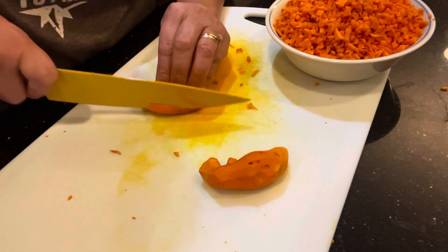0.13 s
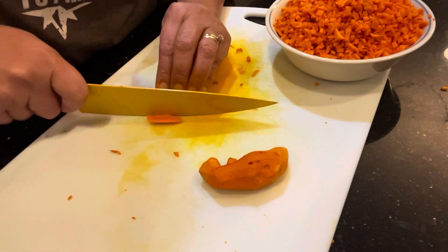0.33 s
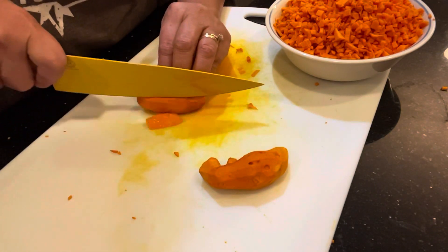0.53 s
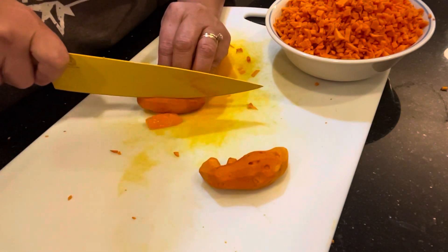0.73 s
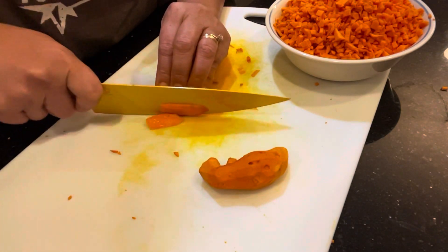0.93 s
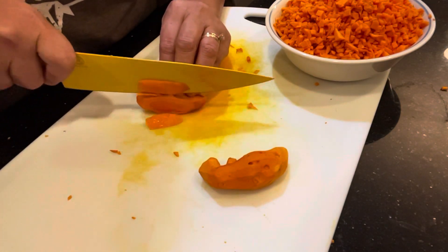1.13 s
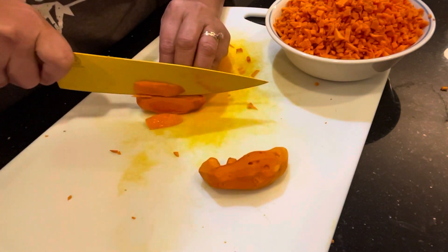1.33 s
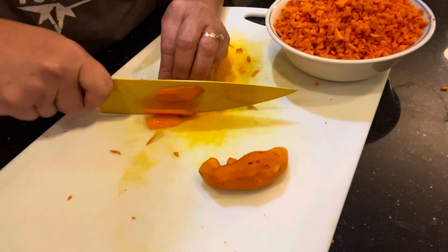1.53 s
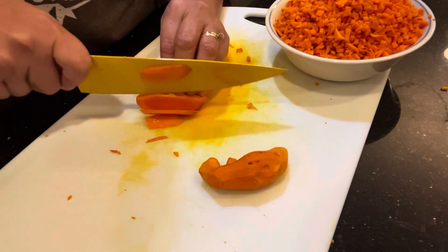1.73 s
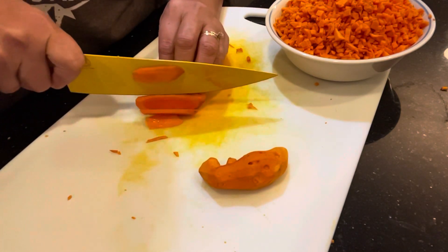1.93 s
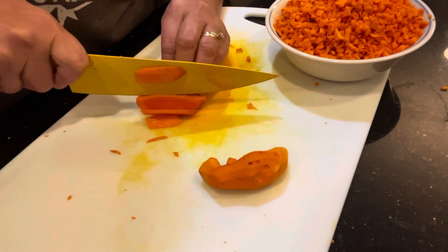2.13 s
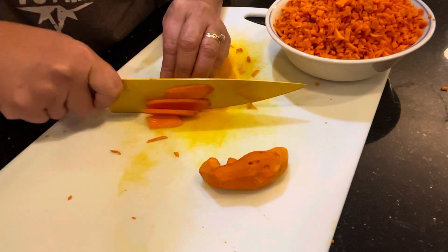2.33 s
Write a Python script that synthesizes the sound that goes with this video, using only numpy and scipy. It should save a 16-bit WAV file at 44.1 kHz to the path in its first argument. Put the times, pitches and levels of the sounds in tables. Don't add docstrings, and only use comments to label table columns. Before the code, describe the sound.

Knife chops through a firm root, close in stereo. Faint taps and a swelling wet crunch lead to a hard, low-bodied knock on the plastic board at 0.16 seconds. Similar crunch-and-knock strokes land at 0.82, slightly the loudest, then 1.46 and 2.27. Between them, tiny ticks and soft slice rubbing. Each blow rings about half a second in the kitchen over quiet low hum.

```python
import sys
import numpy as np
from scipy import signal
from scipy.fft import rfft, irfft, next_fast_len
from scipy.io import wavfile
from scipy.ndimage import uniform_filter1d

SR = 44100
rng = np.random.default_rng(int(sys.argv[2]) if len(sys.argv) > 2 else 0)


def file_out(sig):
    cols = np.atleast_2d(sig).T
    lim = np.clip(cols, -1, 1)
    pcm = np.round(lim * 32767).astype(np.int16)
    wavfile.write(sys.argv[1], SR, pcm)


def invert_db(level):
    return 10 ** (np.asarray(level, dtype=float) / 20)


N = 105046

# start_s, peak_db, brightness_db (per octave), last_rasp_db, split_db
IMPACTS = [
    (.162, -4.5, 1.5, -28, -8.5),
    (0.8184, -3.5, 0.5, -32.5, -17),
    (1.464, -4, 1.5, -37, -14),
    (2.268, -4.5, 0.84, -39.5, -13.5),
]


def evened(x):
    return x / np.sqrt(np.mean(x ** 2) + 1e-20)


def read(points, hz):
    f, value = np.transpose(points)
    return np.interp(np.log(hz + 1), np.log(f + 1), value)


def shape(x, response):
    size = next_fast_len(x.shape[-1] + SR // 4)
    hz = np.fft.rfftfreq(size, 1 / SR)
    return irfft(rfft(x, size) * response(hz), size)[..., :x.shape[-1]]


def add(mix, s, sound):
    part = mix[..., round(s * SR):][..., :sound.shape[-1]]
    part += sound[..., :part.shape[-1]]


def mode(hz, centre_hz, t60):
    width = 2.2 / t60
    return 1j * hz * width / (centre_hz ** 2 - hz ** 2 + 1j * hz * width)


def bumps(hz, table):
    return sum(db * np.exp(-((hz - f) / w) ** 2) for f, w, db in table)


def hum():
    # pitch_hz, level_db (per Hz)
    hum_tone = [(22, -15), (45, 0.5), (60, 2), (220, -6), (400, -20), (1200, -36.5), (5000, -47),
                (15800, -46.5)]
    # pitch_hz, likeness (0 to 1)
    coherence = [(60, 1), (380, 0.43), (2400, 0.13), (9000, 0.27), (12000, 0.91)]
    frames, hz = N // 512 + 5, np.fft.rfftfreq(2048, 1 / SR)
    a, b, c, d, patches = rng.standard_normal((frames, 1025, 5)).T
    patches = evened(uniform_filter1d(uniform_filter1d(patches, 6, 0), 4, 1))
    same = np.clip(read(coherence, hz), -1, 1)[:, None]
    left = a + 1j * b
    right = same * left + np.sqrt(1 - same ** 2) * (c + 1j * d)
    z = np.array([left, right])
    z *= invert_db(read(hum_tone, hz)[:, None] + 2.0 * patches) * (hz > 15)[:, None]
    return invert_db(-53) * evened(signal.istft(z, nperseg=2048, noverlap=1536)[1][:, :N])


def crunch():
    # time_s, level_db
    strokes = [
        [(0.03, -89), (0.05, -70), (0.099, -67), (0.105, -49.5), (0.112, -51.5), (0.124, -47), (0.15, -46),
         (0.154, -38.5)],
        [(0.69, -97), (0.718, -57), (0.728, -62.5), (0.745, -58.5), (0.762, -52.5), (0.78, -40.5), (0.808, -37),
         (0.811, -42)],
        [(1.32, -87.5), (1.345, -73.5), (1.39, -62), (1.402, -50), (1.43, -43), (1.456, -36.5)],
        [(1.97, -81.5), (2.03, -73.5), (2.098, -72.5), (2.17, -64), (2.188, -55), (2.204, -49), (2.246, -39),
         (2.26, -41)],
    ]
    # start_s, length_s, level_db
    scuffs = [(.048, 0.014, -59), (.067, .013, -52.5), (0.081, 0.013, -60.5), (.715, 0.0092, -59.5),
              (2.036, 0.014, -70.5), (2.054, .022, -63), (2.121, 0.024, -69.5), (.2, 0.064, -70.5),
              (0.307, .012, -70), (.31, 0.14, -72), (1.305, 0.0046, -76), (1.96, .008, -73.5),
              (0.507, 0.022, -69), (0.596, 0.026, -82), (0.879, 0.12, -71), (0.976, .06, -75),
              (1.144, 0.037, -87), (1.217, 0.011, -67.5), (1.264, 0.017, -72), (1.3, 0.018, -83),
              (1.599, 0.097, -65.5), (1.8, 0.07, -77.5)]
    # pitch_hz, level_db (per Hz)
    fibre_tone = [(150, -3.5), (400, 0.5), (1500, -5.5), (3000, -2.5), (6000, 0.5), (8500, -2.5),
                  (12500, -3), (15600, 1.54)]
    # pitch_hz, width_hz, level_db
    blade_modes = [(7920, 2500, 5), (4730, 320, 1), (11030, 170, 3.5), (15900, 450, -7.5)]
    rasp_lead_s, rasp_rise_s, rasp_fall_s, release_s = 0.0024, 0.0028, 0.0015, 0.002
    grains_per_s, grain_spread_db, hiss_share = 9800, 2.5, 0.75
    clump_db, clump_s = 2, 0.004

    t, press, rasp = np.arange(N) / SR, 0, 0
    for curve, (s, _, _, rasp_db, _) in zip(strokes, IMPACTS):
        release = np.exp(-np.maximum(t - s, 0) / release_s)
        press = press + invert_db(np.interp(t, *np.transpose(curve), left=-130)) * release
        from_peak = t - s + rasp_lead_s
        width_s = np.where(t < s - rasp_lead_s, rasp_rise_s, rasp_fall_s)
        rasp = rasp + invert_db(rasp_db) * np.exp(-(from_peak / width_s) ** 2)
    for s, length, db in scuffs:
        press = press + invert_db(db) * np.sin(np.pi * np.clip((t - s) / length, 0, 1)) ** 2
    clumps = evened(uniform_filter1d(rng.standard_normal(N), round(clump_s * SR)))
    press = press * invert_db(clump_db * clumps)

    sizes = invert_db(grain_spread_db * np.minimum(rng.exponential(1, N), 4))
    snaps = sizes * (rng.random(N) < grains_per_s / SR)
    drive = evened(snaps * rng.choice([-1., 1.], N)) + hiss_share * rng.standard_normal(N)
    grains = evened(shape(drive, lambda hz: invert_db(read(fibre_tone, hz) + bumps(hz, blade_modes))))
    sung = shape(rasp * grains, lambda hz: 1 + invert_db(11.5) * mode(hz, 7200, 0.0022))
    return invert_db(7.0) * (press * grains + sung)


def tick(hz):
    t = np.arange(600) / SR
    return np.sin(2 * np.pi * hz * t) * np.exp(-t * hz * .6)


def rush():
    rush_s, rush_db, rush_hz, rush_width_hz = 0.005, 0.5, 2860, 2500
    snap_lead_s, snap_s, snap_db = 0.0097, 0.0035, -5.5
    t = np.arange(-2500, 100) / SR
    crackle = rng.standard_normal(len(t)) * invert_db(1.5 * rng.standard_normal(len(t)))
    crackle = evened(shape(crackle, lambda hz: mode(hz, rush_hz, 2.4 / rush_width_hz) ** 2))
    since = np.maximum(t + snap_lead_s, 0) / snap_s
    snap = invert_db(snap_db) * np.minimum(5 * since, 1) * np.exp(-since ** 2)
    swell = np.exp(np.minimum(t, -8 * t) / rush_s) + snap
    return invert_db(rush_db) * crackle * swell / 3


def knock(bright_db):
    # pitch_hz, level_db (per Hz)
    blow_tone = [(44, -10.5), (120, -4), (635, 0), (1200, -1.5), (2600, -10), (4200, -18), (6300, -30),
                 (9000, -39.5)]
    # pitch_hz, delay_ms
    lag = [(45, 41), (110, 9.5), (250, 4), (600, 3.5), (1000, 2.5), (1650, 1.83), (2100, -0.19),
           (5000, 0.41)]
    # pitch_hz, left_db, right_db, t60_s
    board_modes = [(57.5, 7.5, 7.5, 0.54), (53, 2, 1.5, 0.24), (112, -9, -6, 0.15), (239.5, -6.5, -8, 0.12),
                   (415.8, -3.5, 5.5, 0.083), (716.3, -2.5, 0.5, 0.088), (1020, -2, -2, 0.022),
                   (1160, -1, -11, 0.027), (1319, -5.5, -6.5, 0.05), (1673, -7, -5, 0.054),
                   (2087, -0.5, 1.5, .01), (139.6, -4, -5.5, 0.31), (3031, -0.5, -8, 0.028),
                   (3810, -7, -12, 0.0033)]
    # left_db, right_db, room_db
    direct_db = [-3.5, -4, -4]
    # pitch_hz, width_hz, left_db, right_db
    nulls = [(518, 44, -11.5, -7.5), (800, 150, -5.5, -5.5), (1456, 90, -9, -9), (1940, 60, -10.5, -6.5),
             (2504, 170, -13, -12), (3420, 64, -10, -8.5), (3966, 160, -7, -11), (4450, 90, -5.5, 0)]
    flip_hz = 1950
    scatter, scatter_hz, scatter_s = 1, 3000, 0.002343
    room_tilt = 2.1

    hz = np.fft.rfftfreq(1 << 15, 1 / SR)
    turn = -2 * np.pi * np.cumsum(read(lag, hz) / 1000) * hz[1]
    turn = turn + np.pi / (1 + (hz / flip_hz) ** 12)

    ring = invert_db(np.array(direct_db))[:, None]
    for f, left_db, right_db, t60 in board_modes:
        room_db = min(left_db, right_db) - 11.5
        gains = invert_db(np.array([[left_db], [right_db], [room_db]]) + 2.5)
        ring = ring + gains * mode(hz, f * rng.uniform(0.98, 1.02), t60)
    left_dips = bumps(hz, [(f, w, left_db) for f, w, left_db, _ in nulls])
    right_dips = bumps(hz, [(f, w, right_db) for f, w, _, right_db in nulls])
    ring = ring * invert_db(np.array([left_dips, right_dips, 0 * hz]))

    lands = rng.uniform(-.5, 1, (6, 2, 1))
    points = (lands[:, 1] * np.exp(-2j * np.pi * hz * scatter_s * lands[:, 0])).sum(0)
    share = scatter * np.array([[1], [1], [0]]) / (1 + (scatter_hz / (hz + 1)) ** 4)
    ring = ring * (1 + share * points / 2)

    tilt = bright_db * np.array([[1], [1], [room_tilt]]) * np.log2((hz + 200) / 1200)
    blow = irfft(-invert_db(read(blow_tone, hz) + tilt) * (hz > 20) * ring * np.exp(1j * turn))
    blow = np.roll(blow, 100, axis=1)[:, :SR // 2]
    return blow / abs(blow[:2].mean(0)).max()


def kitchen(pair, spread):
    # left_ms, right_ms, left_db, right_db
    echoes = [(1.1, .7, -15, -5.5), (3.4, 3.9, -9.5, -6), (7.7, 8.1, -18.5, -11.5),
              (9.3, 8.5, -14.5, -15.5), (14.5, 9.4, -15.5, -20), (20, 18, -18, -12.5)]
    # pitch_hz, t60_s
    decay = [(60, 1), (250, 0.39), (700, 0.56), (1500, 0.69), (3000, 0.56), (5000, 0.52), (7500, .3),
             (11000, 0.18)]
    # pitch_hz, level_db
    tail_tone = [(60, -1.5), (300, 0.5), (1000, -2), (3000, 2.5), (6000, -0.5), (8500, -3), (13000, 2.5)]
    # pitch_hz, common_part (ratio)
    common = [(60, 1.9), (300, 6.1), (800, 0.093), (5000, 0.13), (9000, 2.2), (12000, 13)]

    taps = np.zeros((3, SR))
    at = np.arange(300, SR - 20, 20) + rng.integers(0, 20, (3, (SR - 301) // 20))
    np.put_along_axis(taps, at, rng.choice([-1., 1.], at.shape), 1)
    hz, t, z = signal.stft(taps, SR, nperseg=256)
    shared = read(common, hz)[:, None]
    z = (z[:2] + shared * z[2]) / np.sqrt(1 + shared ** 2)
    fade_db = read(tail_tone, hz)[:, None] - 60 * t / read(decay, hz)[:, None]
    tail = signal.istft(z * invert_db(fade_db), SR, nperseg=256)[1]
    tail = invert_db(-10.5) * tail / np.linalg.norm(tail[0])

    early = np.zeros((2, SR // 10))
    for left_ms, right_ms, left_db, right_db in echoes:
        early[0, round(left_ms * SR / 1000)] = invert_db(left_db)
        early[1, round(right_ms * SR / 1000)] = invert_db(right_db)
    dull = shape(early, lambda hz: 1 / (1 + 1j * hz / 6000) ** 2)
    near = signal.fftconvolve(pair, dull, axes=1)[:, :N]
    return near + signal.fftconvolve(spread[None], tail, axes=1)[:, :N]


def drags():
    # start_s, length_s, level_db, pitch_hz
    rubs = [
        (0.49, .17, -72, 1100),
        (1.77, .09, -63.5, 568),
        (2.0, 0.086, -72, 1760),
        (2.14, .07, -66, 1030),
        (1.33, 0.088, -69, 1100),
    ]
    t, total = np.arange(N) / SR, np.zeros(N)
    for s, length, db, f in rubs:
        swell = np.sin(np.pi * np.clip((t - s) / length, 0, 1))
        rubbing = evened(shape(rng.standard_normal(N), lambda hz: mode(hz, f, 0.0081) ** 2))
        total += invert_db(db) * swell * rubbing
    return total


def ports(pair):
    # pitch_hz, left_lead_rad
    port_turn = [(300, 0.01), (2500, -1.9), (8200, -4), (8800, -3.14), (11300, 0.01), (12200, 0.01),
                 (13900, 3.1), (16000, 5.2)]
    return shape(pair, lambda hz: np.exp(.5j * np.outer([1, -1], read(port_turn, hz))))


def gate(pair):
    # pitch_hz, level_db
    bars = [(3000, -72), (5000, -61), (7800, -59), (9200, -43), (10300, -59), (12500, -58), (14000, -42.5),
            (15600, -52)]
    follow = .7
    lead = 672
    sides = np.array([pair[0] + pair[1], pair[0] - pair[1]]) / 2
    hz, _, z = signal.stft(np.pad(sides, ((0, 0), (lead, 0))), SR, nperseg=2048)
    power = abs(z[:, :1024]) ** 2
    band_db = 10 * np.log10(power.reshape(2, 32, 32, -1).sum(2) + 1e-14)
    moment_db = 10 * np.log10(power.sum((0, 1)) + 1e-14)
    bar_db = read(bars, hz[16::32])[:, None] + follow * moment_db
    kept = np.repeat(np.clip((band_db - bar_db) / 2 + .5, 0, 1), 32, axis=1)
    z = z * np.pad(kept, ((0, 0), (0, 1), (0, 0)))
    mid, side = signal.istft(z, SR, nperseg=2048)[1][:, lead:lead + N]
    return np.array([mid + side, mid - side])


def scene():
    # start_s, peak_db, pitch_hz
    taps = [(.036, -47, 3710), (0.054, -51, 1200), (.073, -43.5, 2700), (0.105, -41.5, 400),
            (0.519, -54, 498), (.581, -45, 1200), (.583, -44, 313), (.719, -49.5, 295), (.744, -48.5, 1100),
            (.763, -43, 994), (1.155, -50.5, 700), (1.222, -49, 5610), (1.223, -55, 1160),
            (2.174, -53.5, 1070), (2.19, -47.5, 1074)]
    near, blows = crunch() + drags(), np.zeros((3, N))
    for s, db, bright_db, _, split_db in IMPACTS:
        add(blows, s - 100 / SR, invert_db(db) * knock(bright_db))
        add(near, s - 2500 / SR, invert_db(split_db) * rush())
    for s, db, hz in taps:
        add(near, s, invert_db(db) * tick(hz))
    room = kitchen(near + blows[:2], near + blows[2])
    return blows[:2] + ports(near + room + hum())


def low_pass(x):
    return signal.sosfilt(signal.butter(12, 15930, fs=SR, output="sos"), x)


def record(dry):
    low_cut_hz, edge_hz = 42, 15920

    def response(hz):
        upper_edge = np.clip((edge_hz - hz) / 250, 0, 1) ** .5
        return upper_edge / np.sqrt(1 + (low_cut_hz / (hz + 1)) ** 10)

    return low_pass(gate(shape(dry, response)))


dry = scene()
out = record(dry)
file_out(out)
```